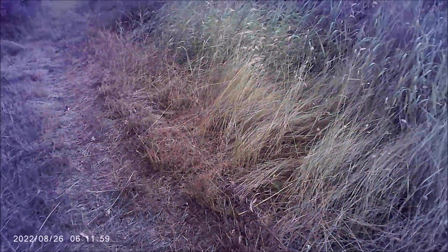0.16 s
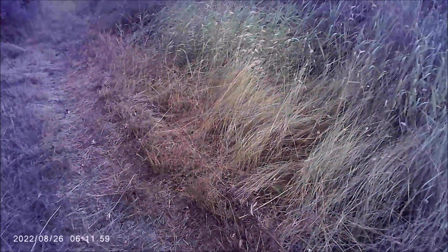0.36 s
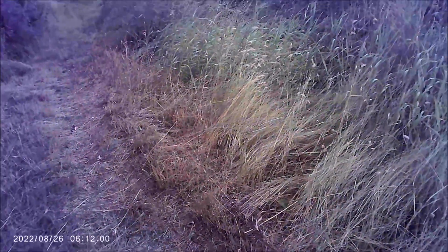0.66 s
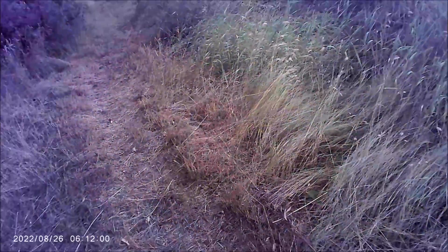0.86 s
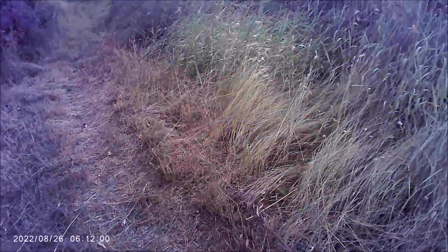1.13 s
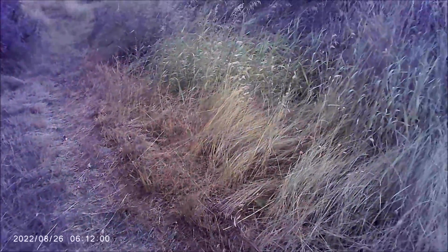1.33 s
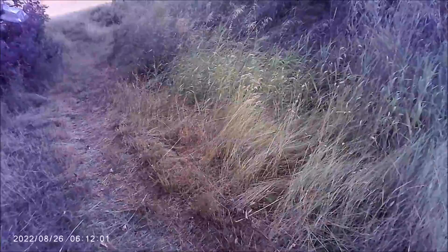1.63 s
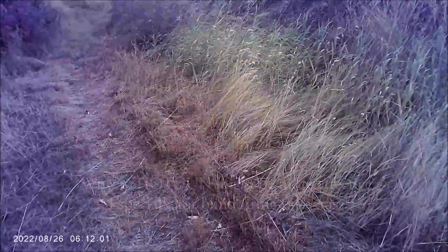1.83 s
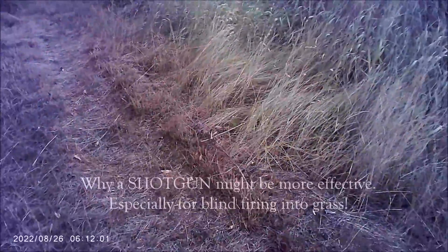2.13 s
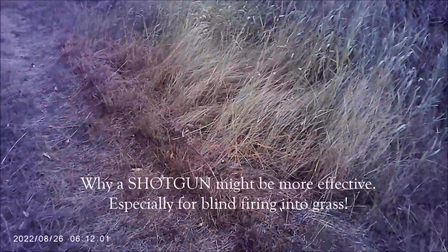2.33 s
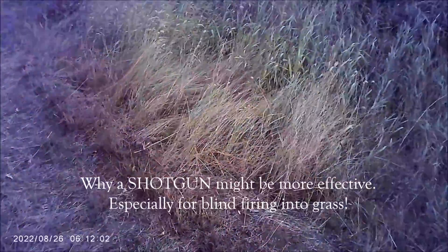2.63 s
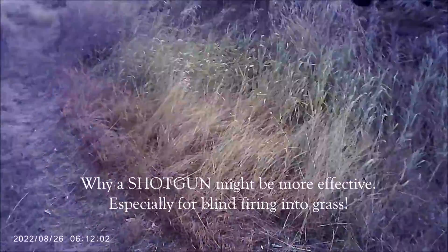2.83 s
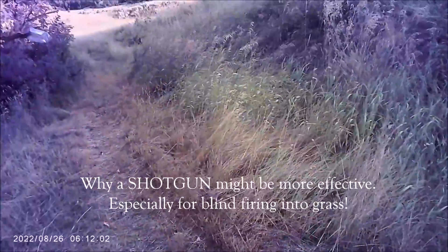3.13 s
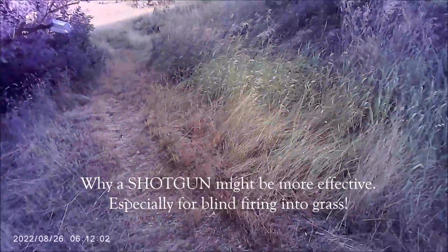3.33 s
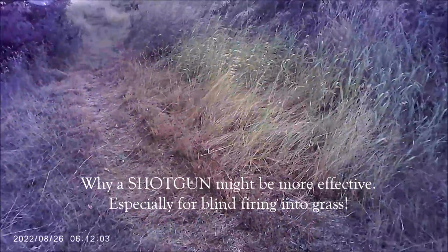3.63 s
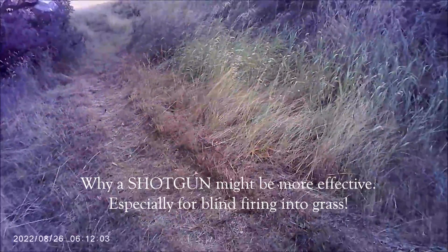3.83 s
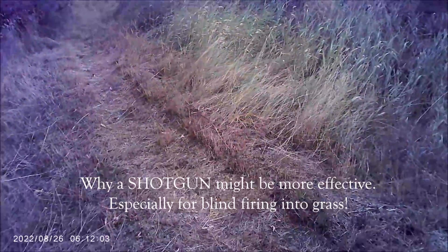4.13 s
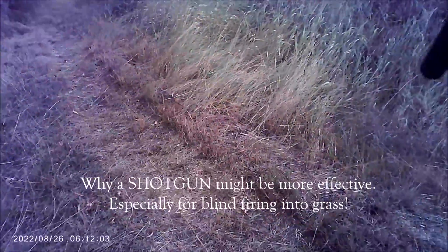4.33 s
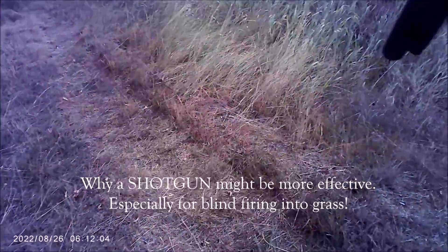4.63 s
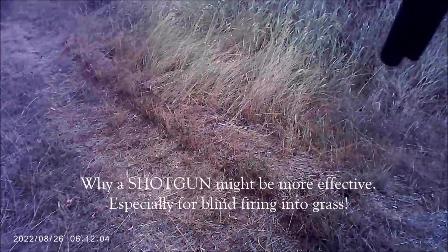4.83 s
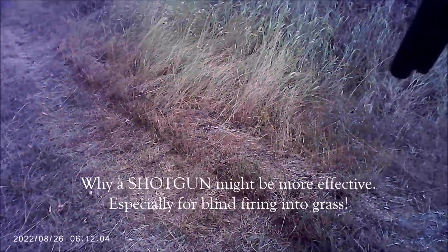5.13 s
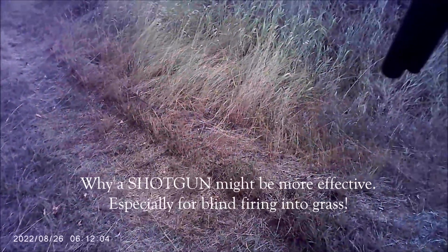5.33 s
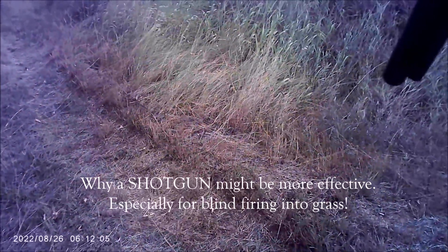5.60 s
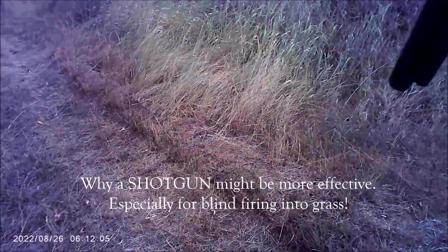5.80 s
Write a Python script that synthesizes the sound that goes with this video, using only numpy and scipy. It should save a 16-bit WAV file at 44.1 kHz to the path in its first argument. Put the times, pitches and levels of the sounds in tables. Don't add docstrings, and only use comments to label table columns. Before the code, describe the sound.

Outdoors, close mono pickup with limited treble: a continuous dry snake rattle dominates from start to end. Under it lie low wind rumble and a faint, regular electrical throb. Grass and clothing rustle, metal squeaks thinly, gear taps and stalks tick. A very sharp double clack cuts through early on; later a strap creaks softly. Handling thins out toward the end while the buzz becomes slightly slower and quieter.

```python
import sys
import numpy as np
from scipy import signal
from scipy.fft import rfft, irfft, next_fast_len
from scipy.io import wavfile
from scipy.ndimage import uniform_filter1d

SR = 44100
rng = np.random.default_rng(int(sys.argv[2]) if len(sys.argv) > 2 else 0)


def persist_wave(psi):
    counts = np.round(np.clip(psi, -1, 1) * 32767).astype(np.int16)
    wavfile.write(sys.argv[1], SR, np.atleast_2d(counts).T)


def level_to_linear(level):
    exponent = np.asarray(level, float) / 20
    return 10 ** exponent


N = 262836

# time in seconds, half swings per second.
TAIL_BEAT = [(0.0, 116.94), (0.77, 115.04), (1.01, 117.5), (1.26, 113.98), (1.8, 117.63), (2.29, 114.99),
             (2.84, 122.32), (3.04, 119.19), (3.72, 120.61), (4.15, 115.63), (4.64, 117.13), (4.79, 114.97),
             (5.29, 113.4), (5.96, 108.91)]
# share of the swing [0-1], level in dB.
TAIL_TURNS = [
    (.02, 2.1),
    (.527, 4.1),
]
# time in seconds, level in dB, part under 4.5 kHz in dB over its mean (microphone aim).
RATTLE_LEVEL = [(0, -38, -1), (.9, -39, 1), (1.4, -40, 0.9), (2.3, -40.5, 0), (2.9, -39.5, 0),
                (3.4, -40.5, .8), (4, -42, 1.5), (4.6, -41.5, -1.5), (5.96, -43.5, -0.1)]
# frequency in Hz, level in dB per Hz.
HORN_COLOUR = [(1500, -61), (2800, -34), (3350, -23), (3850, -18.5), (4500, -16.5), (4900, -10),
               (5250, -1.5), (5600, -3.5), (5940, -1), (6300, -2.5), (6900, -11.5), (7400, -15),
               (7750, -23.5), (8300, -43.5)]
# start in seconds, length in seconds, stalk hiss in dB,
# cloth rub in dB against the hiss.
MOVES = [
    (0.453, 0.78, -62, -5),
    (1.011, .35, -66, 5.5),
    (1.349, 0.34, -59.5, -5.5),
    (2.1, 0.75, -66, 0.5),
    (2.494, 0.41, -68, 6),
    (2.752, 0.77, -61, -4.5),
    (3.286, .42, -67, 10),
    (3.497, 0.96, -63, -1),
]
# frequency in Hz, level in dB per Hz.
STALK_COLOUR = [(500, -28.5), (1000, -3.5), (1350, -0.6), (1800, -3), (2400, -4), (3200, -7.5),
                (5000, -13.5), (8000, -16.5)]
# frequency in Hz, level in dB per Hz.
CLOTH_COLOUR = [(120, -23.5), (250, 3), (400, 2.2), (650, -0.5), (900, -3), (1500, -22.5)]
# time in seconds, peak in dB, pitch in Hz.
KNOCKS = [(1.135, -46, 330), (1.146, -44, 330), (1.152, -41, 497), (1.172, -47.5, 468), (1.336, -51.5, 665),
          (1.357, -51.5, 587), (1.398, -50, 514), (1.443, -50, 584), (1.658, -51, 503), (2.598, -31.5, 670),
          (2.67, -47, 600), (2.679, -46.5, 1150), (2.683, -40, 471), (2.71, -45, 581), (2.739, -50, 506),
          (2.789, -47.5, 584), (3.39, -41, 480), (3.398, -44, 420), (3.422, -46, 700), (3.5, -54, 720),
          (3.53, -53, 708), (3.588, -48.5, 635), (3.639, -51.5, 810), (4.289, -47, 487), (4.31, -51, 490),
          (5.315, -51, 452)]
# time in seconds, peak in dB, pitch in Hz.
STALK_TICKS = [(1.127, -46, 1400), (1.14, -41, 2220), (1.1595, -42, 2500), (1.298, -49, 1500),
               (1.357, -49, 1400), (1.398, -50, 1500), (2.349, -50, 2290), (2.418, -35, 2400),
               (2.4923, -41.5, 2530), (3.1272, -45, 2690), (3.642, -50, 2710)]
# start in seconds, length in seconds, peak in dB, pitch in Hz.
STRAP_CREEPS = [
    (2.64, .16, -53.5, 750),
    (3.349, .1, -49, 700),
    (3.46, .16, -56, 720),
    (4.009, .1, -56.5, 1330),
    (4.055, .03, -55, 1350),
    (4.15, .1, -60, 1090),
]
# time in seconds, peak in dB.
SNAP_CLACKS = [
    (1.5815, -21),
    (1.5827, -27),
    (1.5842, -17.5),
    (1.5852, -17.5),
    (1.5861, -29),
]
# frequency in Hz, level in dB per Hz.
SNAP_COLOUR = [(2000, -56), (3300, -14), (3900, -1.5), (5000, 1.5), (6500, 5.5), (7200, 2), (7800, -17),
               (8300, -47)]
LOW, SECOND, THIRD, FOURTH, FIFTH, TOP = 986, 1259, 1500, 2150, 2303, 3459
# start in seconds, length in seconds, mode in Hz, level in dB.
SWIVEL_SQUEAKS = [(0.591, .065, SECOND, -66), (.685, .05, FIFTH, -65.5), (.695, .035, FOURTH, -66.5),
                  (.69, .058, TOP, -63), (0.821, .05, SECOND, -69), (.83, 0.11, TOP, -61.5),
                  (.82, 0.036, THIRD, -67), (.9, .09, LOW, -71), (.92, .05, SECOND, -66),
                  (1.02, 0.046, SECOND, -63.5), (1.098, 0.25, TOP, -65.5), (1.501, .09, TOP, -65),
                  (1.519, 0.086, FIFTH, -67), (2.362, .08, SECOND, -69), (2.881, 0.066, LOW, -61),
                  (2.876, 0.098, FIFTH, -60.5), (2.91, .067, THIRD, -66), (2.93, 0.032, FOURTH, -65),
                  (3.17, 0.11, TOP, -62), (3.55, 0.14, THIRD, -71.5), (3.706, 0.052, LOW, -64.5),
                  (4.04, .042, FIFTH, -69), (4.238, .05, FIFTH, -71)]
# frequency in Hz, level in dB per Hz.
AIR_COLOUR = [(1, -6.5), (5, -1), (12, -3), (30, -14), (60, -20.5), (130, -29.5), (300, -40.5),
              (650, -52.5), (1500, -57), (2300, -67), (5000, -53.5), (7800, -66.5), (8400, -94)]
# middle in seconds, level left of the weak partials in dB,
# frequency in Hz and level in dB of the partial held steady.
PATCHES = [(.557, -18, 4600, -68), (.788, -44, 4450, -61), (0.898, -16, 4170, -57),
           (1.047, -15, 1251, -61.5), (1.987, -19, 3350, -64), (2.176, -21, 3270, -66),
           (2.626, -21, 714, -59), (3.735, -17, 3970, -59), (3.844, -14, 346, -62.5),
           (4.14, -17, 1074, -68), (4.225, -14, 478, -60), (4.225, -0.5, 739, -62.5),
           (4.332, -15, 443, -62.5), (5.207, -18, 3650, -64), (5.508, -36, 4500, -70),
           (5.59, -18, 4540, -70)]


def evened(x):
    return x / np.sqrt(np.mean(x ** 2) + 1e-20)


def read(points, hz):
    f, value = np.transpose(points)
    return np.interp(np.log(hz + 0.086), np.log(f + 0.083), value)


def curve(rows, column=1):
    rows = np.transpose(rows)
    return np.interp(np.arange(N) / SR, rows[0], rows[column])


def add(mix, s, sound):
    part = mix[round(s * SR):][:len(sound)]
    part += sound[:len(part)]


def coloured(x, points):
    size = next_fast_len(len(x))
    gain = level_to_linear(read(points, np.fft.rfftfreq(size, 1 / SR)))
    return evened(irfft(rfft(x, size) * gain, size)[:len(x)])


def causal(db):
    log = np.log(level_to_linear(np.maximum(np.r_[db, db[-2:0:-1]], -100)))
    return np.fft.ifft(np.exp(log - 1j * signal.hilbert(log).imag)).real[:1024]


def grains(per_s, spread_db):
    size = level_to_linear(spread_db * np.minimum(rng.exponential(1, N), 3.2)) * rng.choice([-1., 1.], N)
    return size * (rng.random(N) < per_s / SR)


def ring(hz, t60_s, rise_s=.0001):
    t = np.arange(1500) / SR
    x = np.sin(2 * np.pi * hz * t) * level_to_linear(-60 * t / t60_s) * (1 - np.exp(-(t / rise_s) ** 2))
    return x / abs(x).max()


def tone(hz, db, length_s, taper):
    t = np.arange(0, length_s, 1 / SR)
    return np.sqrt(2) * level_to_linear(db) * np.sin(2 * np.pi * hz * t) * signal.windows.tukey(len(t), taper)


def swing_db(swing, hold=.05):
    settle, slack, gather, wait = (.1, -2.8), (.18, -4.4), (.32, .4), (-.085, .4)
    rows = []
    for at, db in TAIL_TURNS:
        rows += [(at - hold / 2, db), (at + hold / 2, db)]
        rows += [(at + shift, level) for shift, level in (settle, slack, gather, wait)]
    share, db = np.transpose(rows)
    return np.interp(swing, share, db, period=1)


def rattle(per_s=8000, spread_db=2.0, bump_db=13, bump_hz=300, scatter_db=-5, scatter_t60_s=0.045, count=32):
    swing = (.157 + np.cumsum(curve(TAIL_BEAT)) / SR / 2) % 1
    clatter_db = swing_db(swing)
    clacks = grains(per_s * level_to_linear(clatter_db / 2), spread_db) * level_to_linear(clatter_db)
    contact = rng.integers(0, count, N)
    hz = np.fft.rfftfreq(2048, 1 / SR)
    paths = rng.standard_normal((count, 1500)) * level_to_linear(-60 * np.arange(1500) / SR / scatter_t60_s)
    paths *= level_to_linear(scatter_db) / np.linalg.norm(paths, axis=1)[:, None]
    paths[:, 0] = 1
    out = np.zeros(N)
    for k, own_hz in enumerate(np.linspace(2600, 8300, count)):
        bump = bump_db / (1 + ((hz - own_hz) / bump_hz) ** 2)
        clack = signal.fftconvolve(causal(read(HORN_COLOUR, hz) + bump), paths[k])
        out += signal.oaconvolve(clacks * (contact == k), clack)[:N]
    dull = signal.sosfiltfilt(signal.butter(4, 4500, fs=SR, output="sos"), out)
    aimed = out + (level_to_linear(curve(RATTLE_LEVEL, column=2)) - 1) * dull
    return level_to_linear(curve(RATTLE_LEVEL)) * evened(aimed)


def moving(still_db, rub_share):
    power = np.full(N, level_to_linear(still_db) ** 2)
    for s, length_s, db, rub_db in MOVES:
        swell = signal.windows.tukey(round(length_s * SR), 0.63)
        add(power, s, level_to_linear(db + rub_share * rub_db) ** 2 * swell)
    return np.sqrt(power)


def rustle(noise_share=0.57):
    clumps = level_to_linear(3.3 * evened(uniform_filter1d(rng.standard_normal(N), 500)))
    grain_share = 1 - noise_share
    hiss = noise_share * rng.standard_normal(N) + grain_share * evened(grains(900 * clumps, 4.8))
    rub = noise_share * rng.standard_normal(N) + grain_share * evened(grains(260 * clumps, 4.0))
    stalks = moving(-70, 0) * coloured(hiss, STALK_COLOUR)
    cloth = moving(-67, 0.93) * coloured(rub, CLOTH_COLOUR)
    return stalks + cloth


def gear_knocks(ring_s=0.0069, tick_db=-17.5):
    out = np.zeros(N)
    for s, db, hz in KNOCKS:
        rise_s = 0.000068 * level_to_linear(-.6 * (db + 34))
        thud = level_to_linear(db + 6.0) * ring(hz, ring_s, rise_s)
        tick = level_to_linear(db + tick_db) * ring(1400, 0.0017)
        add(out, s + .001, thud + tick)
    return out


def stalk_ticks():
    out = np.zeros(N)
    for s, db, hz in STALK_TICKS:
        add(out, s + 0.003, level_to_linear(db) * ring(hz, 0.0027))
    return out


def creep(length_s, db, hz, per_s=60, spread_db=-1, detune=.12, sag_per_s=2.54):
    count = int(length_s * per_s) + 1
    ring_s = 7 / 600 * (hz / 600) ** .6
    out = np.zeros(round(length_s * SR) + 1500)
    for k, (late, size, tune) in enumerate(rng.uniform(-1, 1, (12, 3))[:count]):
        own_hz = hz * (1 + detune * tune) * np.exp(-sag_per_s * k / per_s)
        creak = level_to_linear(db + spread_db * size) * ring(own_hz, ring_s, 0.0022)
        add(out, (k + 0.403 + 0.405 * late) / per_s, creak)
    return out


def strap_creaks():
    out = np.zeros(N)
    for s, length_s, db, hz in STRAP_CREEPS:
        add(out, s, creep(length_s, db, hz))
    return out


def snap():
    out = np.zeros(N)
    crack = causal(read(SNAP_COLOUR, np.fft.rfftfreq(2048, 1 / SR)))
    for s, db in SNAP_CLACKS:
        add(out, s, level_to_linear(db) * crack / abs(crack).max())
    return out


def swivel_squeaks():
    out = np.zeros(N)
    drift = uniform_filter1d(uniform_filter1d(rng.standard_normal(N), 400), 400)
    grip = level_to_linear(3.0 * evened(drift))
    for s, length_s, hz, db in SWIVEL_SQUEAKS:
        squeak = tone(hz, db, length_s, 0.51)
        add(out, s, squeak * grip[round(s * SR):][:len(squeak)])
    return out


def wind():
    return level_to_linear(-40) * coloured(rng.standard_normal(N), AIR_COLOUR)


def circuit(height_db=-39.5, edge_hz=190, leak_hz=6):
    per_s, first_s, length_s = 21.002, .0252, 1 / 126
    phase = (np.arange(N) / SR - first_s) * per_s % 1
    square = (phase < length_s * per_s) * level_to_linear(height_db)
    rounded = signal.sosfiltfilt(signal.butter(2, edge_hz, fs=SR, output="sos"), square - square.mean())
    return signal.lfilter(*signal.butter(1, leak_hz, "high", fs=SR), rounded)


def scene():
    handling = gear_knocks() + stalk_ticks() + strap_creaks() + snap() + swivel_squeaks()
    mono = rattle() + rustle() + handling + wind() + circuit()
    return np.tile(mono, (2, 1))


def patched(x, size=1764, patch_s=.013, keep_db=-17):
    out, window = x.copy(), np.hanning(size)
    hz = np.fft.rfftfreq(size, 1 / SR)
    t = (np.arange(size) - size // 2) / SR
    fade = np.clip((patch_s / 2 + .005 - abs(t)) / .008, 0, 1)
    for s, left_db, *_ in PATCHES:
        first = round(s * SR) - size // 2
        z = rfft(x[first:first + size] * window)
        is_weak = abs(z) < level_to_linear(keep_db) * abs(z[hz > 4000]).max()
        weak = irfft(z * is_weak, size) / np.maximum(window, .1)
        add(out, first / SR, (level_to_linear(left_db) - 1) * fade * weak)
    return out


def held_tones(x):
    for s, _, hz, db in PATCHES:
        add(x, s - .018, tone(hz, db, 0.041, 0.53))
    return x


def top_cut(x):
    return signal.sosfilt(signal.butter(12, 8265, fs=SR, output="sos"), x)


def record(dry):
    x = held_tones(patched(dry[0]))
    band_limit = signal.firwin(201, 8050, window=("kaiser", 7), fs=SR)
    x = signal.oaconvolve(x, band_limit, "same")
    offset = .0077
    return top_cut(np.tile(x + offset, (2, 1)))


dry = scene()
out = record(dry)
persist_wave(out)
```